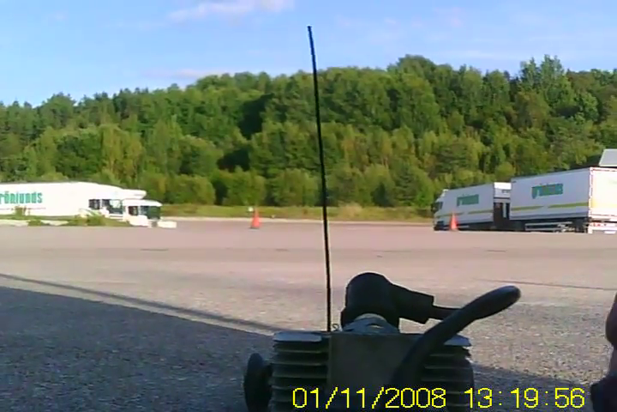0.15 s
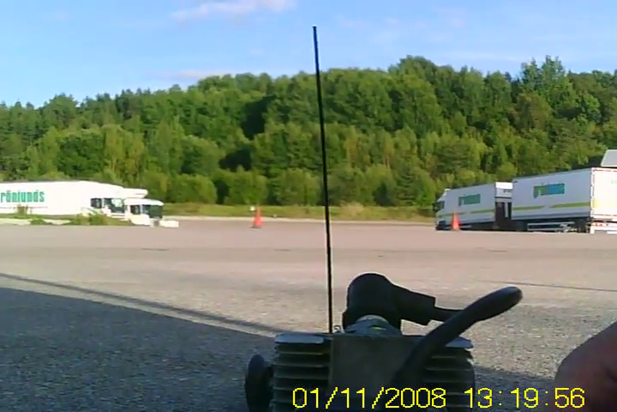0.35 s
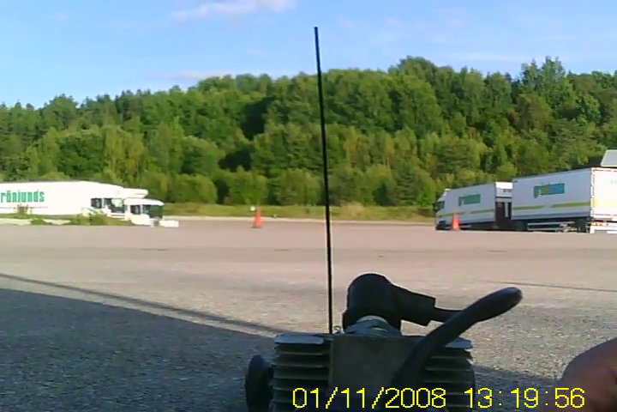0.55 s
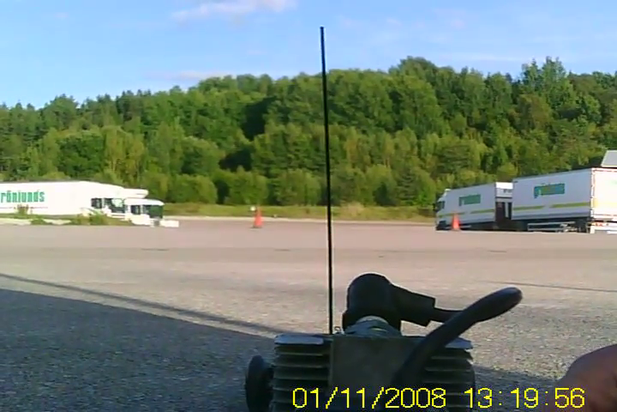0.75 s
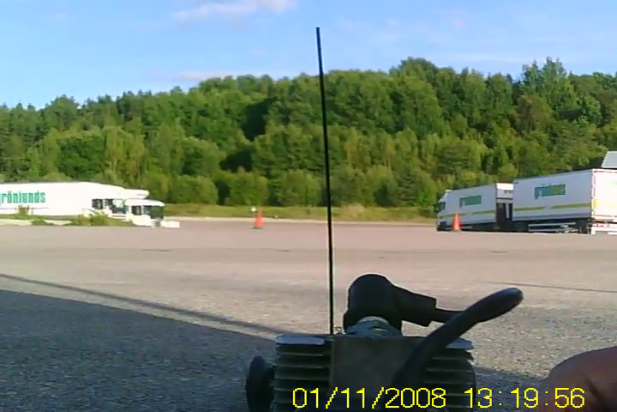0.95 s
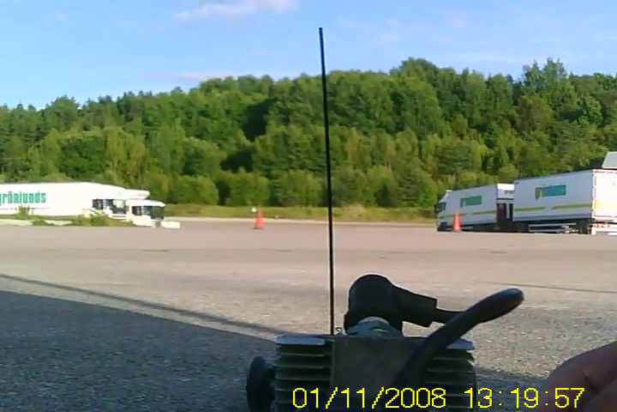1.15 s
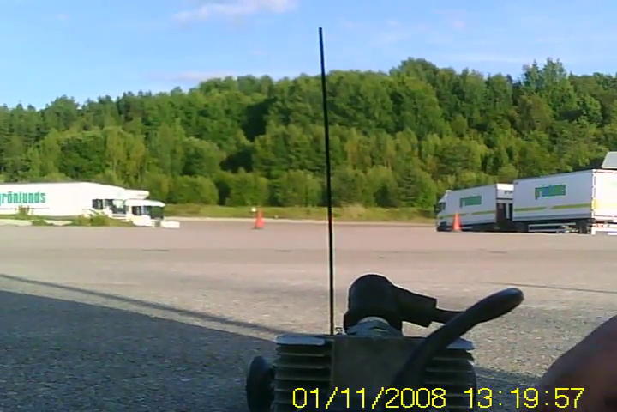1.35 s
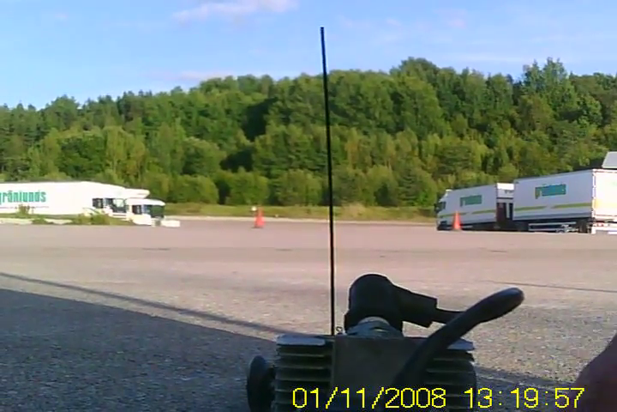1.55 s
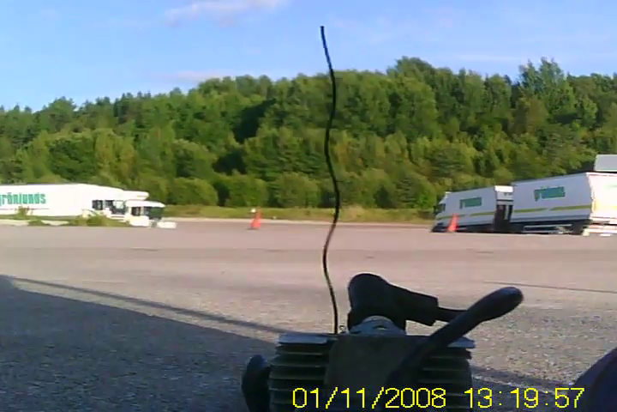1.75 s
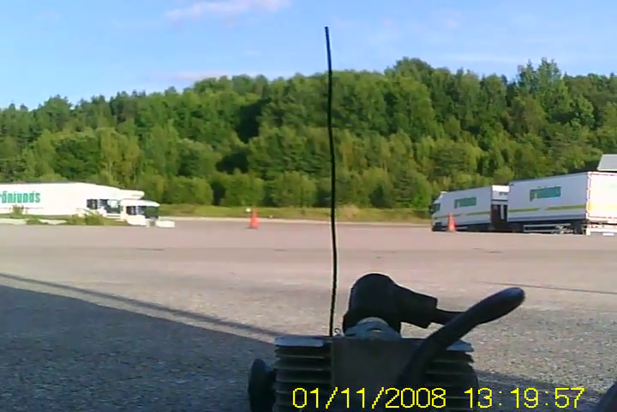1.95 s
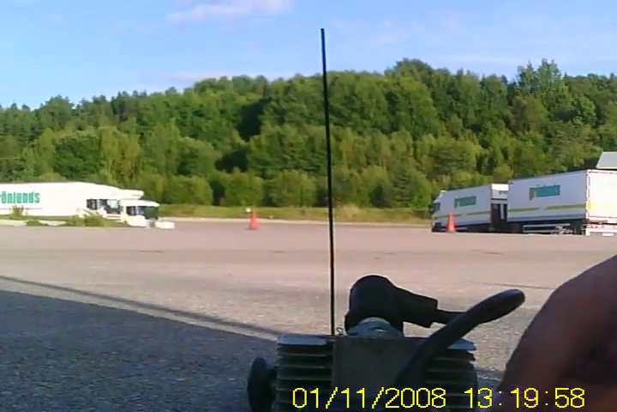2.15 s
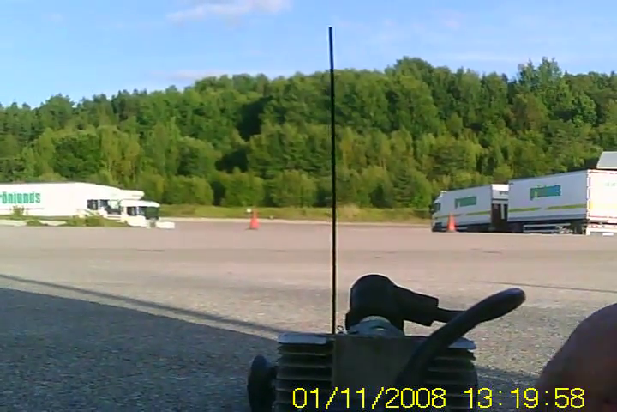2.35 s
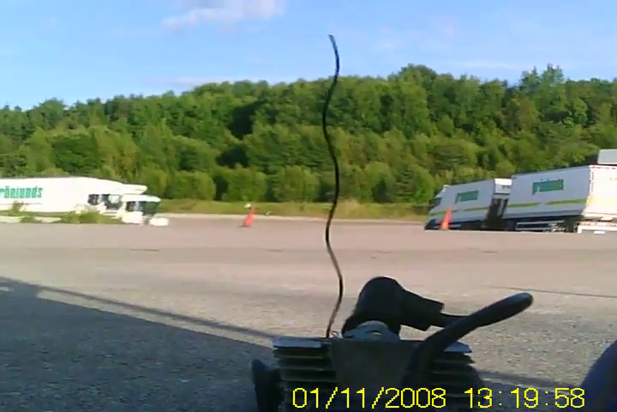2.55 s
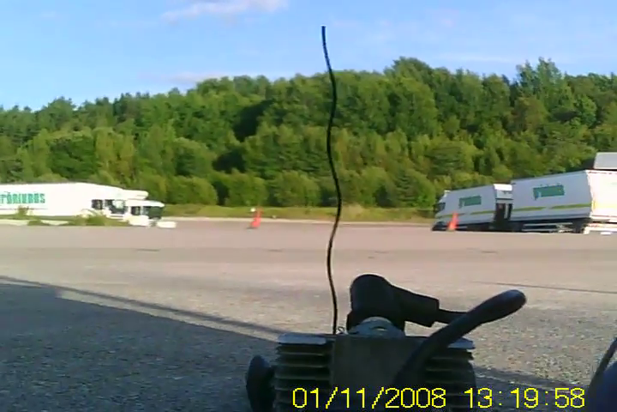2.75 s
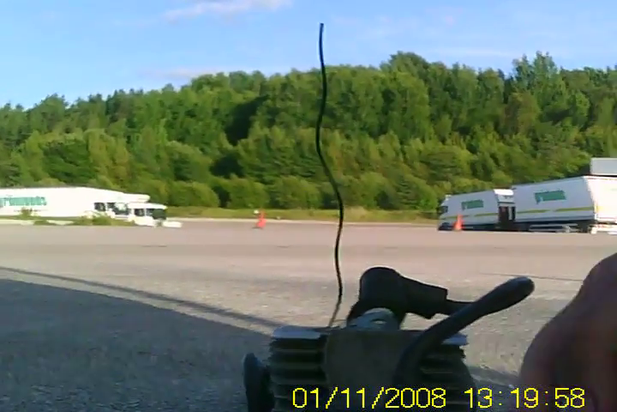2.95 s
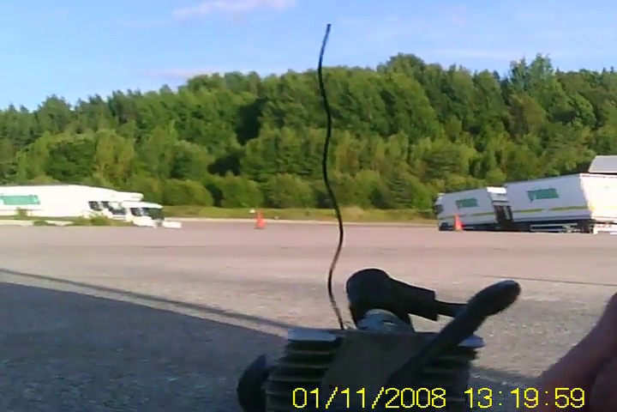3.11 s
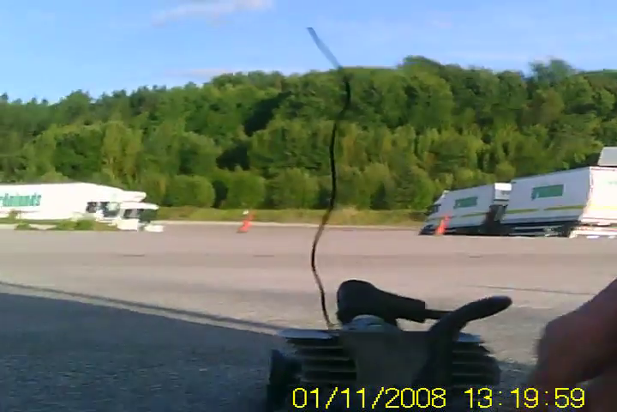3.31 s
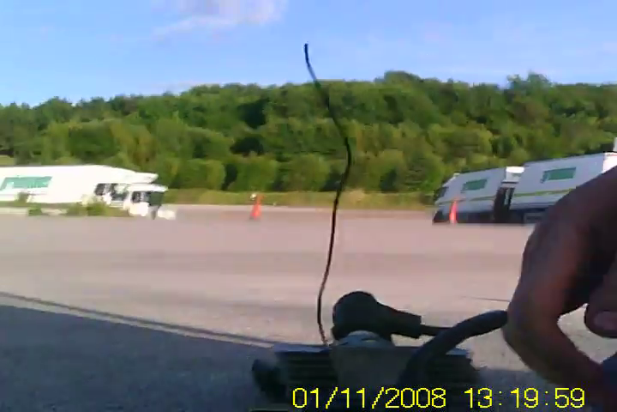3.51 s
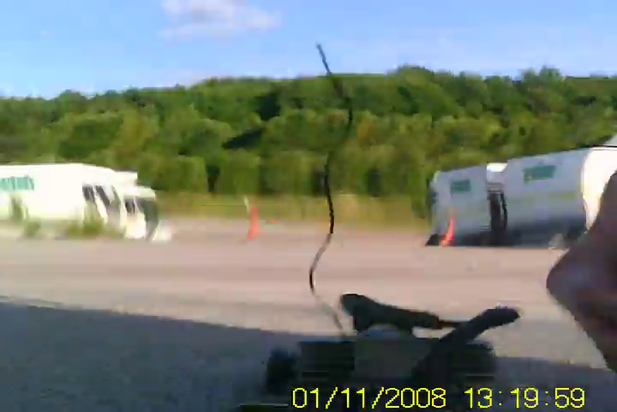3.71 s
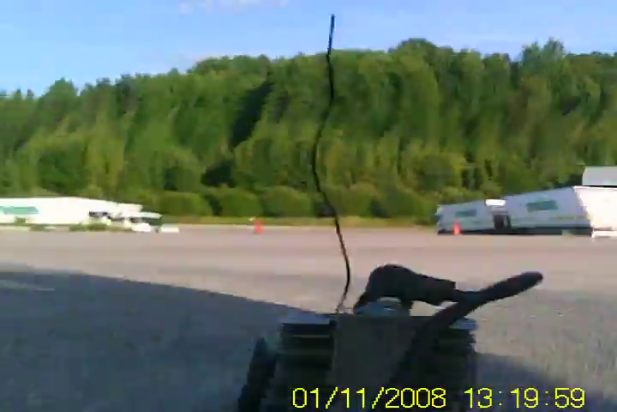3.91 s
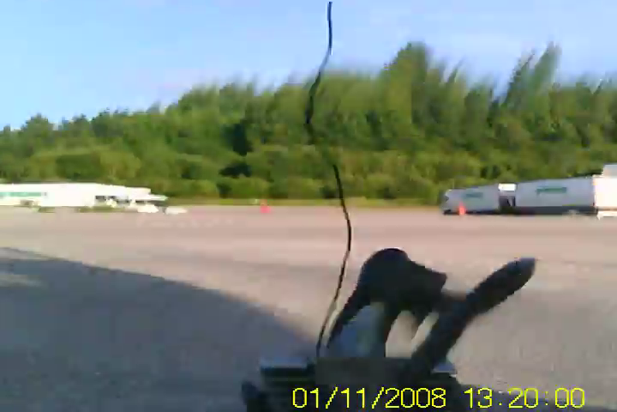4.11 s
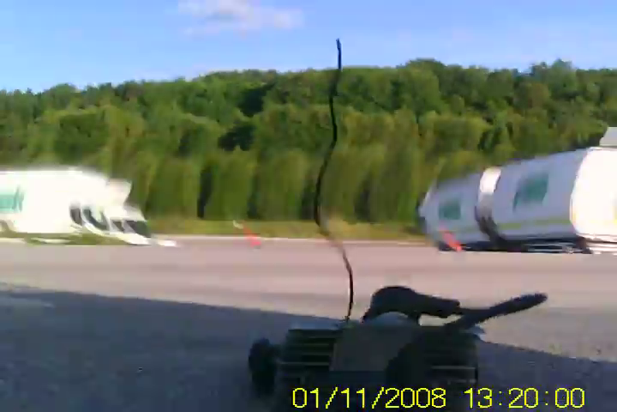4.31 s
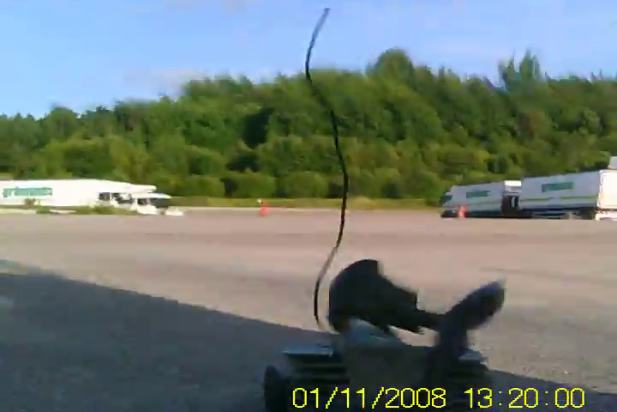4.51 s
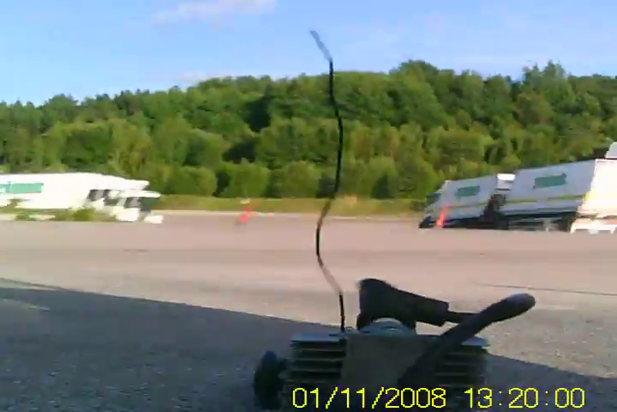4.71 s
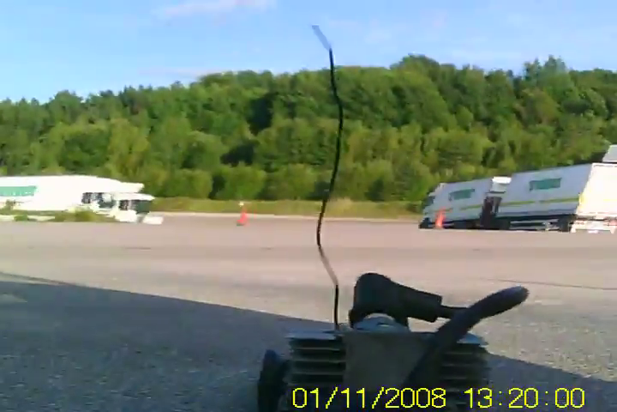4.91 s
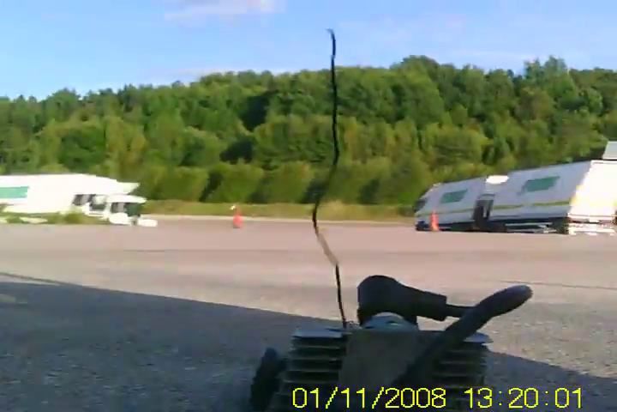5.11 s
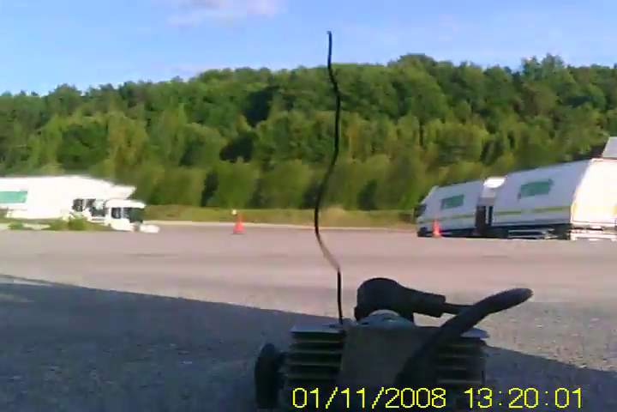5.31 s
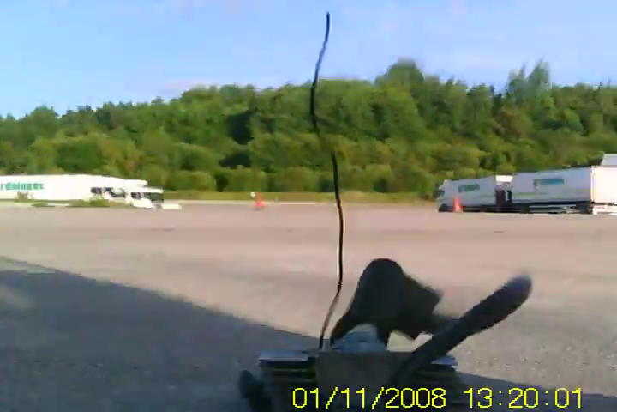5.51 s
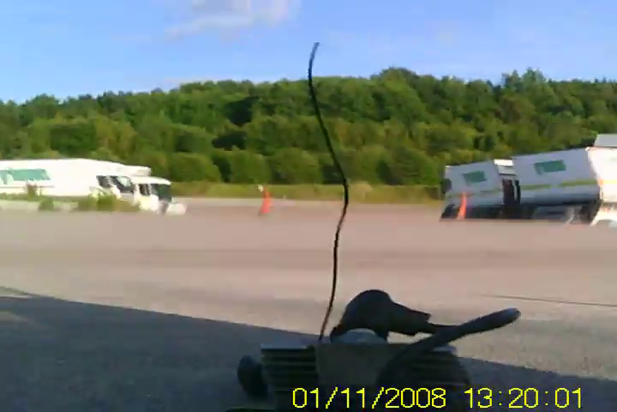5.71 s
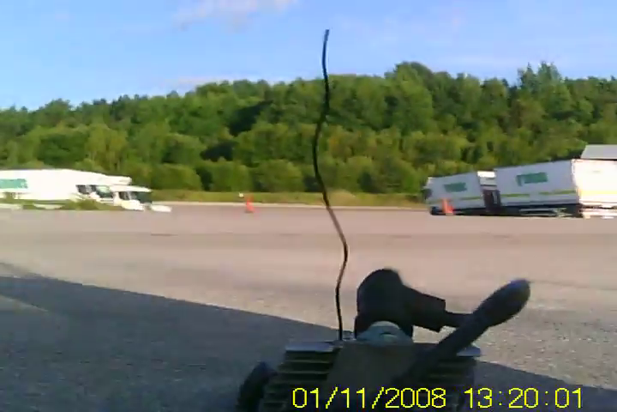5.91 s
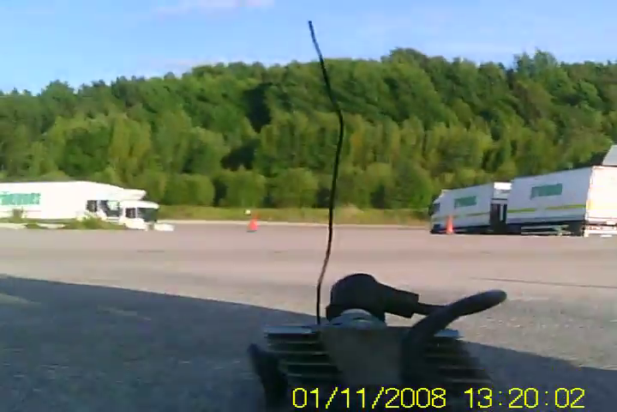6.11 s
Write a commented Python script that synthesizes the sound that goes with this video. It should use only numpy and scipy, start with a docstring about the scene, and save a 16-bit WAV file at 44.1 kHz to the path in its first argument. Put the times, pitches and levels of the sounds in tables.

```python
"""The cord rattles back after an early pull, over a faint outdoor rumble; then a small two-stroke engine is started.
Each pull rattles the starter pawls (noise bursts) and pumps air through the exhaust pipe (ringing tones).
A failed pull gives two stray barks; the next barks repeatedly, speeds up and catches.
At idle the piston clacks on every turn, but the charge fires only every second or third turn.
The microphone has little treble and its amplifier clips the loudest bangs."""
import sys
import numpy as np
from scipy import signal
from scipy.fft import rfft, irfft
from scipy.io import wavfile
from scipy.ndimage import uniform_filter1d

SR = 44100
rng = np.random.default_rng(int(sys.argv[2]) if len(sys.argv) > 2 else 0)


def transcribe(signal):
    """Save signal, clipped to [-1, 1], as a 16-bit WAV file at the path in sys.argv[1]."""
    frames = np.atleast_2d(signal).T
    limited = np.clip(frames, -1, 1)
    pcm = np.round(limited * 32767).astype(np.int16)
    wavfile.write(sys.argv[1], SR, pcm)


N = 276066
TIME = np.arange(N) / SR  # the whole scene, s
RING = np.arange(8192) / SR  # time within one short sound, s


def undb(db):
    """Turn decibels into a gain."""
    return 10 ** (np.asarray(db) / 20)


def unit(x):
    """Scale a sound to rms 1."""
    return x / np.sqrt(np.mean(x ** 2))


def add(out, s, sound):
    """Mix a sound in at time s, cut to fit the scene."""
    i = int(round(s * SR))
    first, last = max(i, 0), min(i + len(sound), N)
    if last > first:
        out[first:last] += sound[first - i:last - i]


def curve(points, at=TIME):
    """Read a curve of (time [s], value) points at the given times."""
    return np.interp(at, *np.transpose(points))


def band(x, lo_hz, hi_hz, order=2):
    """Keep only the frequencies between two limits."""
    limits = [lo_hz, min(hi_hz, .45 * SR)]
    return signal.sosfilt(signal.butter(order, limits, "bandpass", fs=SR, output="sos"), x)


def noise(tone):
    """Make noise of rms 1, coloured by (frequency [Hz], level [dB]) points."""
    hz, db = np.transpose(tone)
    f = np.maximum(np.arange(N // 2 + 1) * SR / N, 1)
    colour = undb(np.interp(np.log(f), np.log(hz), db))
    return unit(irfft(rfft(rng.standard_normal(N)) * colour, N))


def ring(modes, stretch=1):
    """Ring a body after one blow: each tone dies away; stretch raises all pitches together."""
    hz, t60, db = np.transpose(modes)[:, :, None]
    decay = np.exp(-np.log(1000) * RING / t60)
    tones = undb(db) * decay * np.cos(2 * np.pi * hz * stretch * RING)
    return tones.sum(0) / undb(db).sum()


def push(out, s, body, width):
    """Drive a ringing body with a smooth push of the given width [s], centred on time s."""
    t = np.arange(-256, 257) / SR
    bell = np.exp(-.5 * (t / width) ** 2)
    add(out, s + t[0], signal.fftconvolve(body, bell / bell.sum()))


def burst(decay, hold=0, rise=0.000043):
    """Shape a sound's loudness: a quick rise, a hold and an exponential fall (all in s)."""
    return (1 - np.exp(-RING / rise)) * np.exp(-np.maximum(RING - hold, 0) / decay)


# colour of the outdoor rumble: (frequency [Hz], relative level [dB])
AIR_TONE = [(15, -60), (25, 0.5), (76, -11), (164, -9), (301, -19), (326, -22.5), (616, -20), (824, -25.5),
            (1640, -29), (1870, -17.5), (2500, -35.5), (3260, -30.5), (5120, -44), (7420, -35.5),
            (14000, -50)]


def air(level_db=-53):
    """The faint rumble of the open yard is steady noise, strongest in the bass."""
    return undb(level_db) * noise(AIR_TONE)


# steady thin tones: (frequency [Hz], rms level [dB])
WHINE_TONES = [(2907, -79), (3876, -81), (5599, -81), (7402, -87)]


def whine():
    """A faint whine is a few steady pure tones."""
    return sum(undb(db) * np.sqrt(2) * np.sin(2 * np.pi * hz * TIME) for hz, db in WHINE_TONES)


# colour of the clatter of loose parts: (frequency [Hz], relative level [dB])
CLATTER_TONE = [(150, -68), (400, 18.5), (800, 11), (1100, 8.5), (1450, -2), (1900, 7), (2600, -14),
                (4000, -52), (8000, -75)]


def loose_parts():
    """Shaken loose parts clatter: a short burst of coloured noise."""
    return noise(CLATTER_TONE)[:len(RING)] * burst(0.025, rise=0.00011)


# nudges of the chassis: (time [s], relative level [dB])
NUDGES = [(0.299, -39.5), (0.372, -47), (2.358, -30)]


def nudges(clatter):
    """The chassis is nudged and its loose parts knock softly."""
    out = np.zeros(N)
    for s, db in NUDGES:
        add(out, s, undb(db) * clatter * burst(0.021, rise=.001))
    return out


# ringing of the starter housing: (frequency [Hz], time to fall 60 dB [s], relative level [dB])
HOUSING = [(1900, 0.051, 4), (2110, 0.092, -1.5), (2990, 0.077, 10.5), (3360, 0.023, 8), (3900, 0.043, 7),
           (5380, 0.042, -43), (6450, 0.033, -45), (8400, 0.015, -48)]


def housing_ring(contact, ring_db=-4):
    """Rough metal contact sets the starter housing ringing."""
    housing = ring(HOUSING)
    scrape = contact * rng.standard_normal(N)
    return undb(ring_db) * signal.fftconvolve(scrape, housing / np.linalg.norm(housing))[:N]


# colour of air spits, intake hiss and handle clicks: (frequency [Hz], relative level [dB])
SPIT_TONE = [(500, -10.5), (2000, 1), (3600, -4.5), (4500, -11.5), (6200, 7), (7800, -6), (10000, -11),
             (12000, -76)]
# clicks of the starter handle on the engine: (time [s], relative level [dB], length of contact [s])
HANDLE = [(0.302, -52, .002), (0.699, -33.5, 0.0037), (0.889, -26.5, 0.002), (1.087, -54, .003),
          (1.285, -47.5, 0.02), (1.532, -42.5, 0.0024)]


def handle(click_db=-7):
    """The starter handle touches the engine: a noisy click that also rings the housing."""
    touch = np.zeros(N)
    for s, db, length in HANDLE:
        add(touch, s, undb(db) * burst(0.0066, hold=length))
    return housing_ring(touch) + undb(click_db) * touch * noise(SPIT_TONE)


# colour of the pawl rattle: (frequency [Hz], relative level [dB])
PAWL_TONE = [(200, -11), (700, -8), (1400, 1.5), (2300, 0.5), (3100, 0.5), (4500, -16), (6300, -13.5),
             (9000, -23), (12000, -49)]
# pawls engaging as the cord is pulled:
# (time [s], level [dB], length held before the rattle fades [s], length of the haul [s])
PAWLS = [(1.563, -14.5, 0.0097, 0.17), (2.38, -19, 0.012, 0.22)]


def pawls(housing_db=-8.5):
    """Pawls rattle into their ratchet: a noise burst that also rings the housing."""
    rattle = np.zeros(N)
    for s, db, length, _ in PAWLS:
        add(rattle, s, undb(db) * burst(0.0093, hold=length, rise=0.00062))
    return rattle * noise(PAWL_TONE) + housing_ring(undb(housing_db) * rattle)


# loudest spits of air at the carburettor: (time [s], level [dB], decay [s])
SPITS = [(0.16, -36.5, 0.0055), (1.851, -32.5, 0.0076), (1.874, -31, 0.0063), (2.423, -26, 0.0034),
         (2.448, -24.5, 0.0031), (2.508, -20, 0.0043), (2.825, -23.5, 0.011), (2.87, -18.5, 0.012),
         (2.932, -24, 0.0075), (2.972, -12, 0.0051), (2.996, -18.5, 0.0056), (3.296, -18, 0.0044),
         (3.317, -18.5, 0.0055)]


def spits():
    """The carburettor spits air: short bursts of coloured noise."""
    spit = np.zeros(N)
    for s, db, decay in SPITS:
        add(spit, s, undb(db) * burst(decay, hold=0.0026, rise=0.00012))
    return spit * noise(SPIT_TONE)


# a bark speeds the crank up for as long as it burns [turns/s per s]; friction eats the gain [s]
KICK_ACCEL, KICK_FADE_S = 3000, .05


def crank(points):
    """Find the crank speed, kicked along by barks in the catching pull, and when each turn is completed."""
    start, end = points[0][0], points[-1][0]
    speed = curve(points)
    for s, _, burn, _ in BARKS:
        if CATCHING_PULL[0][0] <= start < s < end:
            fade = (TIME > s) * np.exp(-np.abs(TIME - s) / KICK_FADE_S)
            speed = speed + KICK_ACCEL * burn * fade
    speed = speed * (TIME >= start) * (TIME <= end)
    angle = np.cumsum(speed) / SR  # in turns
    return speed, np.searchsorted(angle, np.arange(1, int(angle[-1]) + 1)) / SR


# crank speed as an earlier pull dies away: (time [s], speed [turns/s])
COAST = [(.001, 21), (.06, 14.8), (.15, 8.9), (.26, 10.2)]
# crank speed in the pull that fails: (time [s], speed [turns/s])
FAILED_PULL = [(1.597, 37.5), (1.64, 31.3), (1.69, 40.1), (1.76, 31.3), (1.86, 19.3), (1.99, 11.9),
               (2.18, 7.8)]
# crank speed in the pull that catches, before the kicks of the barks: (time [s], speed [turns/s])
CATCHING_PULL = [(2.41, 26.8), (2.48, 37.5), (2.58, 38.8), (2.63, 29.5), (2.72, 21.8), (2.85, 19.8),
                 (2.95, 21.4), (3.01, 27.2), (3.11, 29.9), (3.2, 41.0), (3.35, 42.4)]


def pulls():
    """Join the crank speed of all the pulls, and the times of their strokes."""
    speeds, strokes = zip(*map(crank, (COAST, FAILED_PULL, CATCHING_PULL)))
    return sum(speeds), np.concatenate(strokes)


# below this crank speed [turns/s] strokes and rattle die away
LABOUR_SPEED = 21.6


def vigour(speed, steep=2):
    """Tell how forcefully the engine works at a cranking speed, from 0 to 1."""
    return 1 / np.sqrt(1 + (LABOUR_SPEED / np.maximum(speed, .01)) ** (2 * steep))


# crank speed of the running engine: (time [s], speed [turns/s])
IDLE_SPEED = [(3.383, 49.73), (3.55, 50.51), (3.76, 52.58), (3.93, 50.33), (4.08, 51.98), (4.22, 54.1),
              (4.42, 53.1), (4.54, 55.95), (4.76, 54.88), (5.13, 56.1), (5.36, 51.95), (5.53, 51.52),
              (5.62, 49.48), (5.91, 48.05), (6.02, 46.04), (6.12, 49.98), (6.27, 45.83)]
# spells when the idle fires harder, on every third turn instead of second: (start [s], end [s])
HARD_SPELLS = [(3.39, 3.73), (3.93, 4.21), (4.29, 4.34), (4.42, 5.12), (5.58, 5.70), (5.95, 6.07),
               (6.16, 6.26)]
# strength of the charge as the mixture wanders, before extras: (time [s], relative level [dB])
CHARGE = [(3.4, 3.5), (3.53, -2.5), (3.64, -2.5), (3.7, 3), (3.76, -1.5), (3.82, 0), (3.92, -5.5),
          (4.02, -2), (4.17, 2.5), (4.3, 2), (4.37, -5), (4.5, 1.5), (4.6, 2.5), (4.7, -2.5), (4.78, 2),
          (5.1, -2.5), (5.22, 1), (5.33, -3.5), (5.58, 1.5), (5.95, -1), (6.26, -5)]
# extra strength [dB] of a firing in a hard spell, and of one that has gathered fuel for three turns
HARD_DB, RESTED_DB = 4.5, 3


def idle_turns():
    """List when the exhaust port opens on each idle turn, and the firings as {turn: strength dB}."""
    turns = np.r_[IDLE_SPEED[0][0], crank(IDLE_SPEED)[1]]
    fired, turn, rested = {}, 1, True
    while turn < len(turns):
        s = turns[turn]
        hard = any(start < s < end for start, end in HARD_SPELLS)
        fired[turn] = curve(CHARGE, s) + HARD_DB * hard + RESTED_DB * rested
        turn += 3 if hard else 2
        rested = hard
    return turns, fired


# colour of the gear rattle: (frequency [Hz], relative level [dB])
RATTLE_TONE = [(20, 12), (50, 10), (90, -5), (200, -9), (600, -5), (1000, -4), (1450, -7), (2000, 0),
               (2900, -1), (3700, -1), (4600, -10), (8000, -22)]
# the cord rattling back onto its spool: (time [s], relative level [dB], decay [s])
REWINDS = [(0, -39, 0.074), (1.89, -45, 0.067)]
# hiss of the intake at idle: (time [s], relative level [dB])
INTAKE = [(3.36, -47), (3.66, -41), (3.81, -40), (4.1, -36.5), (4.6, -37), (4.9, -47.5), (5.24, -39),
          (5.55, -56), (6.26, -53)]


def whirr(crank_rattle_db=-39, haul_rattle_db=-32, idle_rattle_db=-46,
          crank_hiss_db=-45, haul_hiss_db=-43, idle_hiss_db=1, rewind_hiss_db=-10,
          hiss_decay=0.0026, hiss_between=0.44, flutter_db=3):
    """Gears rattle, most while the cord is hauled or rewinds; the intake hisses after each stroke."""
    speed, strokes = pulls()
    force = uniform_filter1d(vigour(speed, steep=2.1), size=1500) ** 2
    hauling = sum(1. * (TIME > s) * (TIME < s + length) for s, _, _, length in PAWLS)
    haul = force * uniform_filter1d(hauling, size=1500)
    rewinding = sum(undb(db) * (TIME >= s) * np.exp(-np.abs(TIME - s) / decay) for s, db, decay in REWINDS)
    rewind = uniform_filter1d(rewinding, size=500)
    running = TIME > CATCHING_PULL[-1][0]

    rattle = undb(crank_rattle_db) * force + undb(haul_rattle_db) * haul
    rattle = rattle + rewind + undb(idle_rattle_db) * running
    hiss = undb(crank_hiss_db) * force + undb(haul_hiss_db) * haul
    hiss = hiss + undb(rewind_hiss_db) * rewind + undb(idle_hiss_db + curve(INTAKE)) * running

    breath = np.full(N, float(hiss_between))
    for s in np.r_[strokes, idle_turns()[0]]:
        add(breath, s, 2 * burst(hiss_decay, rise=0.00028))
    # slow noise makes the level of both flutter
    flutter = undb(flutter_db * noise([(10, -6), (50, 0), (150, -8), (600, -50)]))
    return flutter * (rattle * noise(RATTLE_TONE) + hiss * breath * noise(SPIT_TONE))


# ringing of the cylinder: (frequency [Hz], time to fall 60 dB [s], relative level [dB])
CYLINDER = [(2640, 0.01, 19), (3030, 0.012, 7), (3628, 0.0054, 17.5), (6310, 0.006, 17), (8660, 0.0022, 18)]


def clack(out, s, db, gain_db=11, grit=0.23):
    """The piston slaps the finned cylinder: brief bright tones and a little grit."""
    crack = grit * rng.standard_normal(len(RING)) * burst(.0012, rise=.0001)
    stretch = 1 + .012 * rng.standard_normal()
    slap = band(ring(CYLINDER, stretch) + crack, 1320, 7400, order=3)
    add(out, s - .0002, -undb(db + gain_db) * slap)


# ringing of the cold exhaust pipe: (frequency [Hz], time to fall 60 dB [s], relative level [dB])
COLD_PIPE = [(170.3, 0.037, 2), (200.6, 0.063, 1), (229.5, 0.23, -6.5), (327, 0.013, 0.5),
             (458.4, 0.18, -2.5), (465, 0.019, -16), (699, 0.12, -2), (853, 0.088, 2), (990, 0.079, -20)]


def cranking(clatter, stroke_db=7.0, warm_db=-3, barked_db=-4, bark_reach_s=.006,
             uneven_db=1.1, detune=0.013, warm_stretch=0.089,
             soft_width_s=.0011, sharp_width_s=0.0003, clatter_db=-21,
             clack_db=-15, clack_lag_s=.0095, clack_speed=38, clack_slope_db=0.59):
    """Each stroke gulps air through the pipe, then the piston clacks; slow strokes are soft, dull thuds."""
    out = np.zeros(N)
    speed, strokes = pulls()
    for s in strokes:
        chance = rng.standard_normal(3)
        now = np.interp(s, TIME, speed)
        force = vigour(now)
        width = np.interp(force, [.25, .65], [soft_width_s, sharp_width_s])
        # the first ignitions warm the gas in the pipe, which raises its pitches and softens the gulp
        warmth = np.interp(s, [2.65, 2.85, 3.3], [0, .55, 1])
        # a stroke that barks has little vacuum left to fill
        barked = any(abs(s - bark[0]) < bark_reach_s for bark in BARKS)
        gulp_db = stroke_db + warm_db * warmth + barked_db * barked + uneven_db * chance[0]
        gulp = vigour(now, steep=1.6) * undb(gulp_db)
        pipe = ring(COLD_PIPE, 1 + warm_stretch * warmth + detune * chance[2])
        push(out, s - .0003, -gulp * pipe, width)
        add(out, s, vigour(now * 1.154, steep=4.17) * undb(clatter_db) * clatter)
        slap_db = clack_db + clack_slope_db * (now - clack_speed) + uneven_db * chance[1]
        clack(out, s + clack_lag_s, slap_db + 20 * np.log10(force ** 2))
    return out


def thump(swing_hz=17, decay=0.016):
    """The microphone swings back slowly after a pressure blow."""
    return -np.cos(2 * np.pi * swing_hz * RING) * burst(decay, rise=0.0026)


# ringing of the hot exhaust pipe: (frequency [Hz], time to fall 60 dB [s], relative level [dB])
HOT_PIPE = [(129.5, 0.043, -13.5), (197.3, 0.041, -8.5), (248.4, 0.11, -11), (411, 0.023, -6),
            (509, 0.06, -7.5), (574, 0.05, -16), (794, 0.055, -12.5), (906, 0.02, -5), (968, 0.21, -19),
            (1184, 0.032, -10)]
# colour of the bark's blast: (frequency [Hz], relative level [dB])
BARK_TONE = [(100, 6), (500, 9.5), (1200, 1.5), (2000, 5), (3500, -5), (6500, -6), (10000, -9.5),
             (14000, -34)]
# first ignitions: (time [s], level [dB], decay [s], relative level of the pressure thump [dB])
BARKS = [(1.626, -1, 0.00094, -39), (1.6562, -1, 0.002, -27), (2.670, -3.5, 0.0027, -23),
         (2.745, 0.5, 0.0038, -25), (2.857, -6, 0.0076, -26), (2.956, -4, 0.0059, -35),
         (3.0408, -12.5, 0.0012, -28), (3.069, -1.5, 0.0037, -30), (3.1466, 3, 0.002, -29),
         (3.214, 4, 0.0026, -10), (3.28, 8.5, 0.0014, -17), (3.3411, 3, 0.0056, 2.5)]


def barks(pipe_db=2, thump_db=2):
    """Stray charges explode: a blast of gas, the ring of the pipe and a pressure thump."""
    out, blast = np.zeros(N), np.zeros(N)
    for s, db, decay, low_db in BARKS:
        add(blast, s, undb(db) * burst(decay, hold=decay / 2))
        push(out, s + 0.000833, undb(db + pipe_db) * ring(HOT_PIPE), 0.000067)
        add(out, s, undb(low_db + thump_db) * thump())
    return out + blast * noise(BARK_TONE)


# how hard the piston clacks at idle: (time [s], relative level [dB])
SLAP = [(3.38, -13), (3.66, -17), (3.84, -15.5), (3.93, -27.5), (4.03, -23.5), (4.11, -17), (4.25, -16),
        (4.39, -34.5), (4.48, -14.5), (4.56, -16), (4.7, -18), (4.84, -18), (5.05, -20.5), (5.3, -19.5),
        (5.56, -25), (5.79, -13), (6.26, -14)]


def idle(clatter, puff_db=-6, clatter_db=-31, lead_s=.0049, lead_speed=50,
         lead_s_per_speed=0.00044, uneven_db=3.06):
    """Every turn clacks and clatters; a turn that does not fire only puffs softly into the pipe."""
    turns, fired = idle_turns()
    out, pipe = np.zeros(N), ring(HOT_PIPE)
    for turn, s in enumerate(turns):
        chance_db = uneven_db * rng.standard_normal(2)
        # the slower the crank, the further the clack runs ahead of the port
        lead = lead_s + lead_s_per_speed * (lead_speed - curve(IDLE_SPEED, s))
        clack(out, s - lead, curve(SLAP, s) + chance_db[0])
        add(out, s, undb(clatter_db) * clatter)
        if turn not in fired:
            push(out, s - .0003, -undb(puff_db + chance_db[1] / 2) * pipe, .00035)
    return out


# ringing of the crankcase: (frequency [Hz], time to fall 60 dB [s], relative level [dB])
CASE = [(1620, 0.024, -6), (1876, 0.039, -6), (2002, 0.053, -6.5)]


def firings(fire_db=-2.0, suck_db=21.0, knock_db=-13.0, thump_db=-35,
            exhaust_growth=0.18, thump_growth=2.74, case_ring=0.017, uneven_db=2.3):
    """Burning charges knock the crankcase, kick the pipe and thump the microphone; strong ones knock and thump more."""
    out, pipe = np.zeros(N), ring(HOT_PIPE)
    # a single click plus the ring of the case
    knock = band((RING == 0) + case_ring * ring(CASE), 1602, 2258, order=3)
    knock = knock / np.abs(knock).max()
    turns, fired = idle_turns()
    for turn, strength_db in fired.items():
        s = turns[turn]
        db = strength_db + uneven_db * rng.standard_normal()
        # a short suck runs ahead of the blow-down
        push(out, s - .0014, -undb(suck_db + exhaust_growth * db) * np.ones(1), 0.0006)
        push(out, s - .0004, undb(fire_db + exhaust_growth * db) * pipe, 0.0001)
        add(out, s - .0015, undb(knock_db + db) * knock)
        add(out, s, undb(thump_db + thump_growth * strength_db) * thump())
    return out


def scene():
    """Mix the engine over the faint rumble of the open yard and a thin whine."""
    # loose parts clatter the same way on every turn, which gives the idle its pitched buzz
    clatter = loose_parts()
    background = air() + whine()
    starter = nudges(clatter) + handle() + pawls() + spits()
    engine = whirr() + cranking(clatter) + barks() + idle(clatter) + firings()
    return (background + starter + engine)[None]


def record(dry, mic_top_hz=10900, top_hz=15800, ceiling=.74):
    """A small microphone with little treble; its amplifier clips on the bangs."""
    heard = signal.sosfilt(signal.butter(12, mic_top_hz, fs=SR, output="sos"), dry)
    clipped = heard / (1 + (heard / ceiling) ** 12) ** (1 / 12)
    return signal.sosfilt(signal.cheby1(12, .5, top_hz, fs=SR, output="sos"), clipped)


dry = scene()
out = record(dry)
transcribe(out)
```